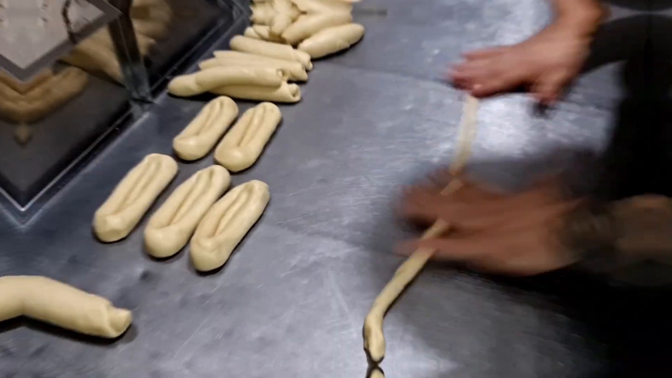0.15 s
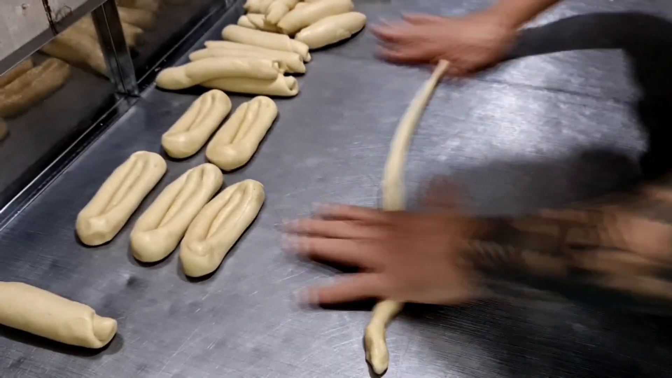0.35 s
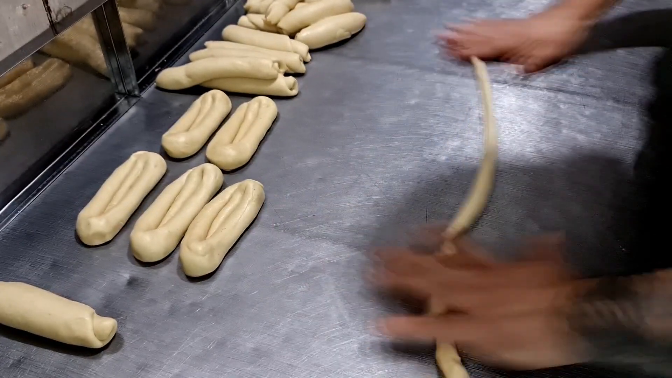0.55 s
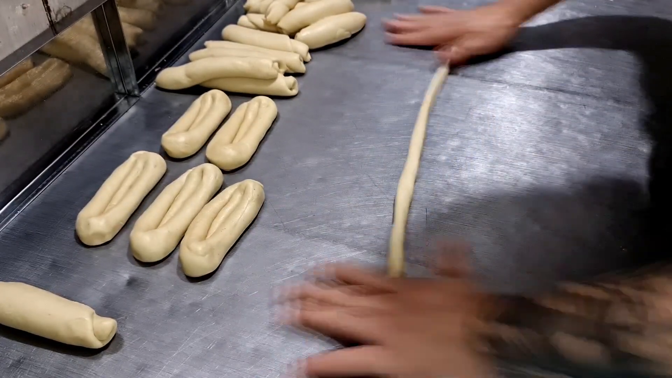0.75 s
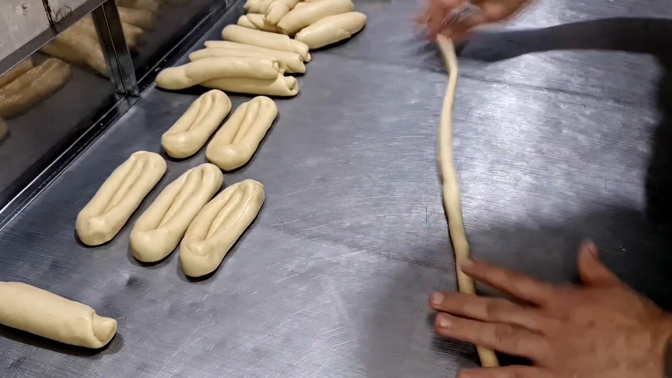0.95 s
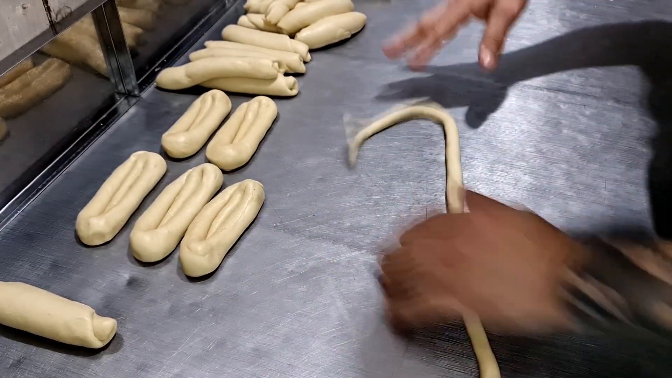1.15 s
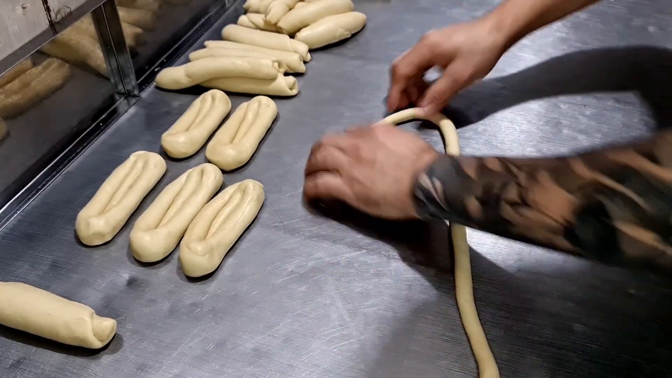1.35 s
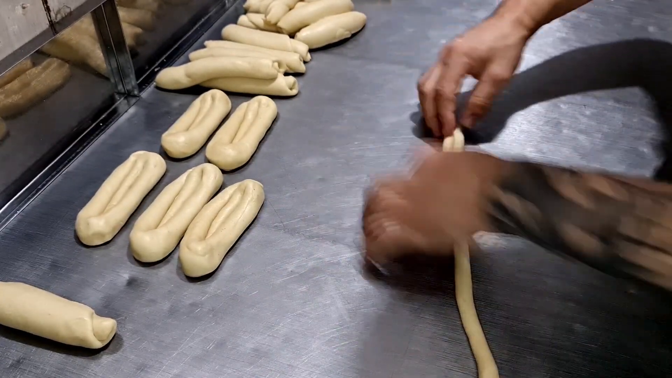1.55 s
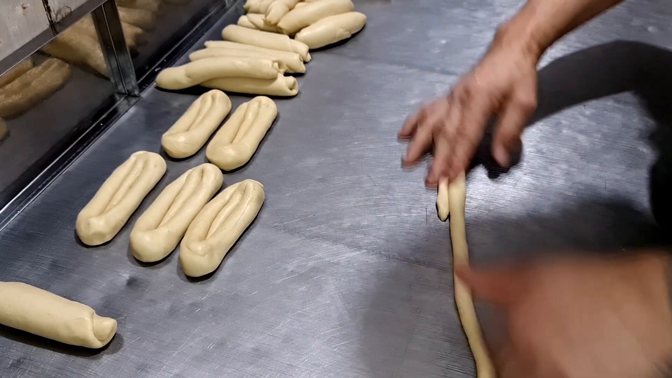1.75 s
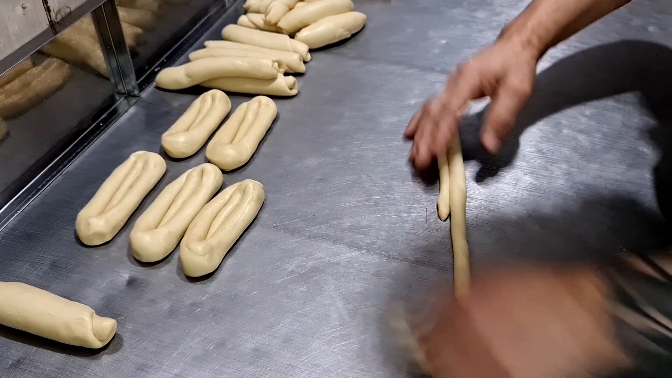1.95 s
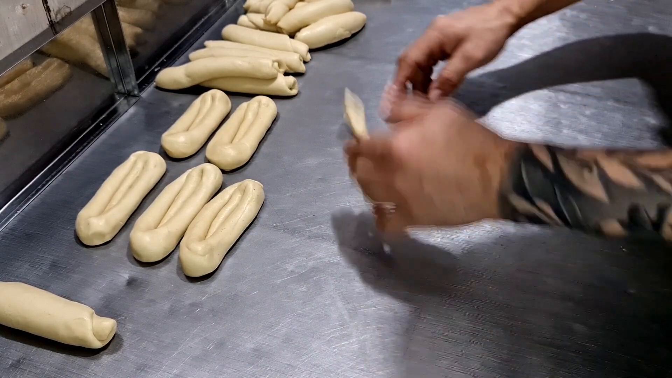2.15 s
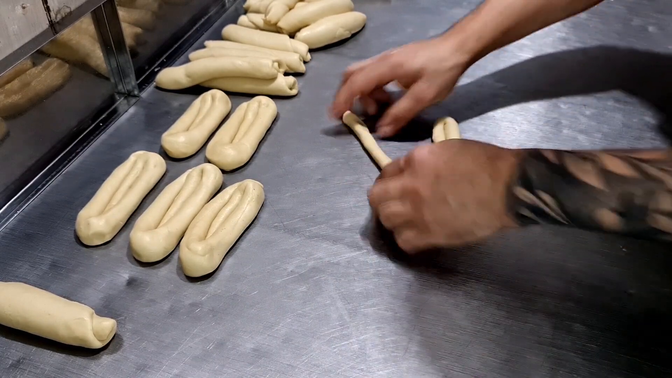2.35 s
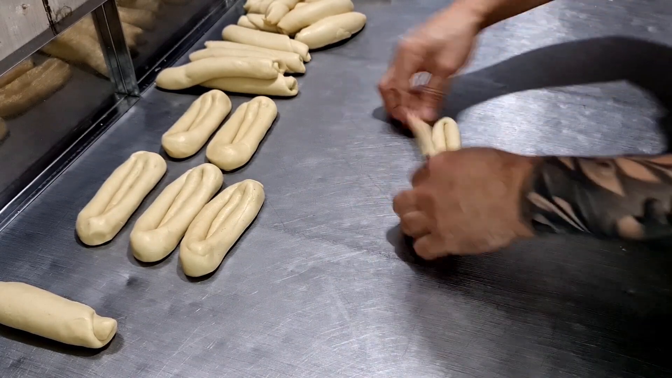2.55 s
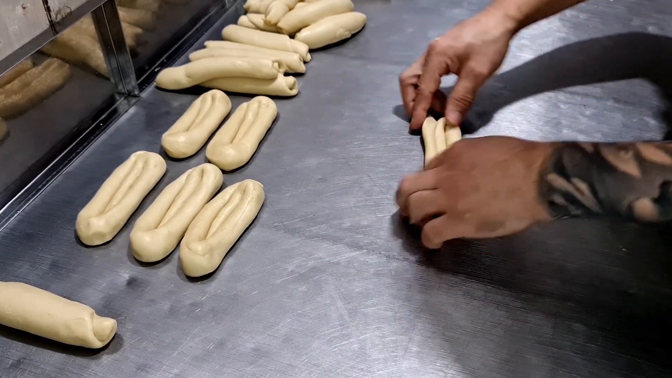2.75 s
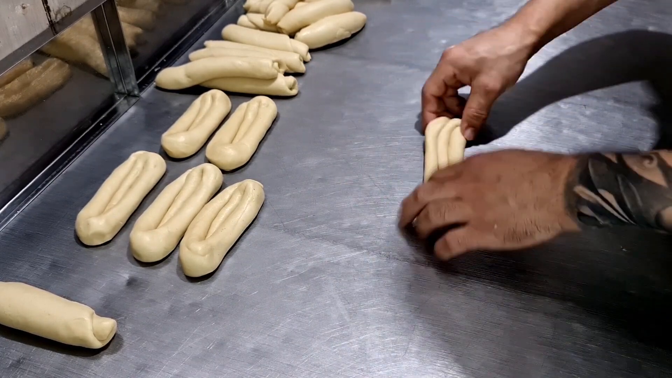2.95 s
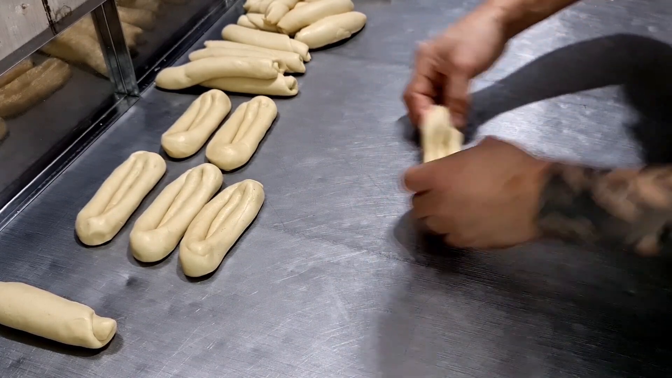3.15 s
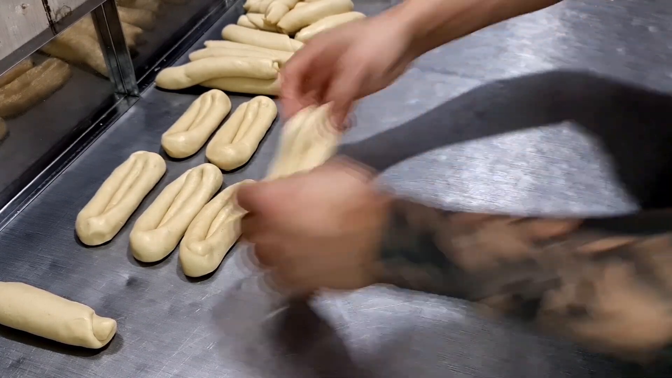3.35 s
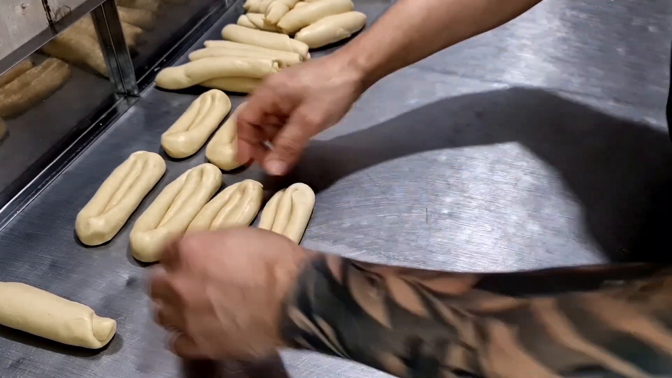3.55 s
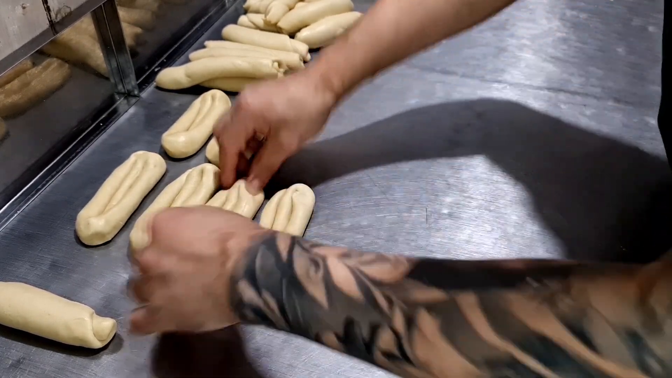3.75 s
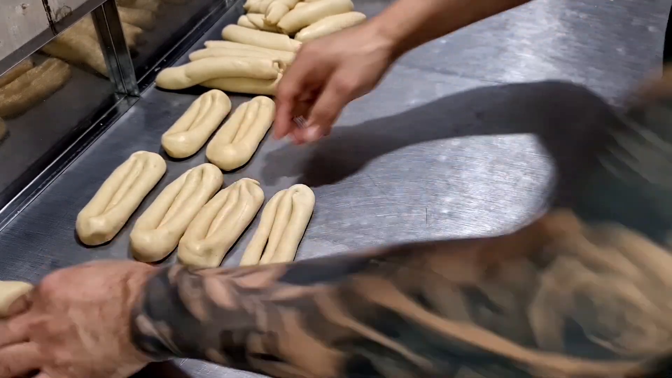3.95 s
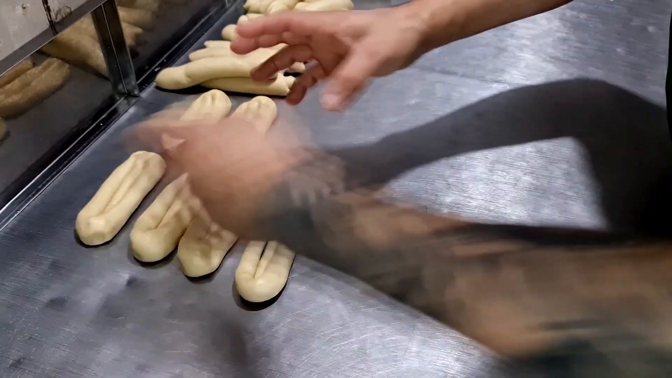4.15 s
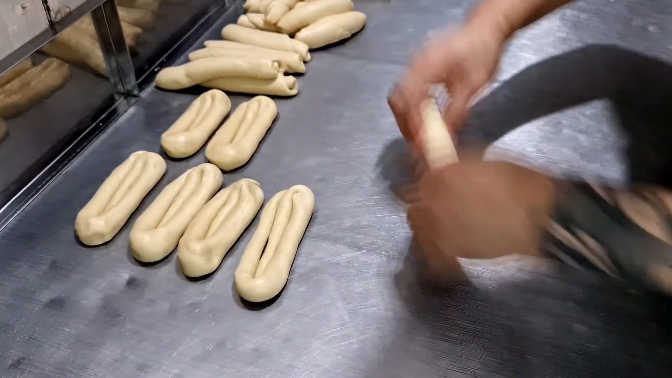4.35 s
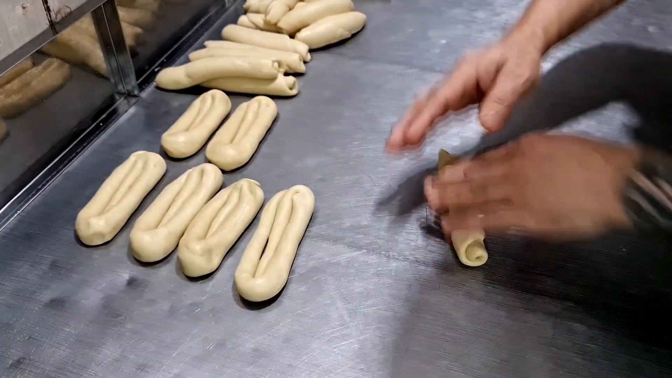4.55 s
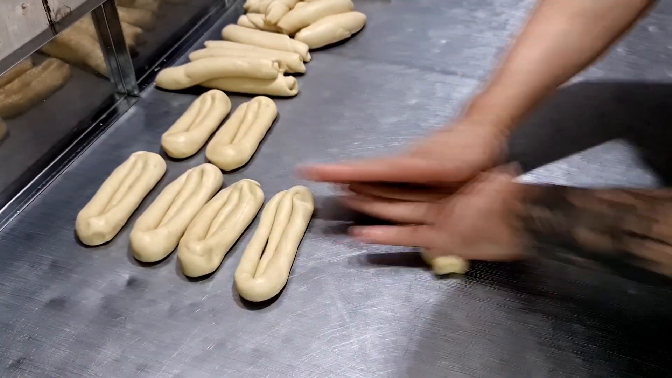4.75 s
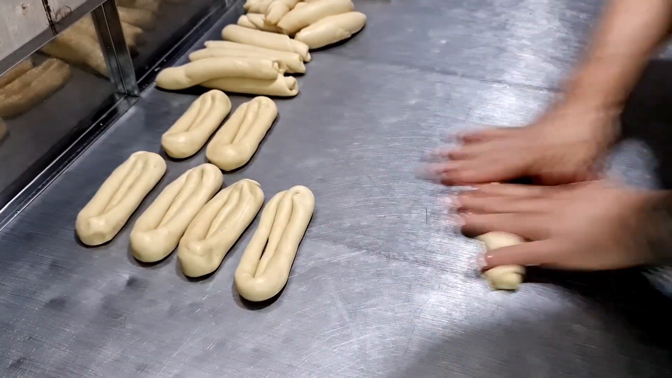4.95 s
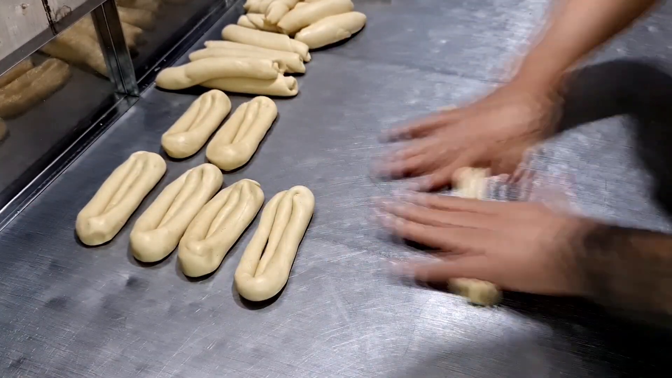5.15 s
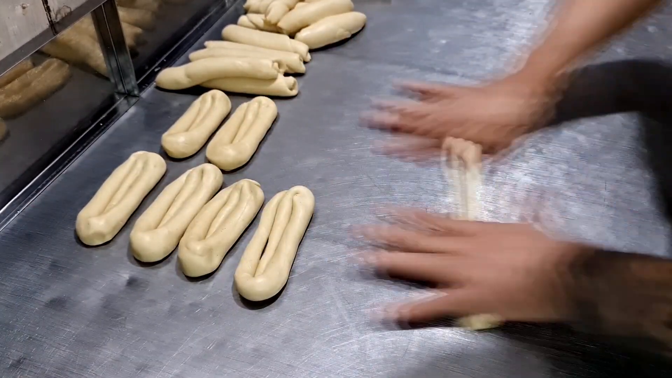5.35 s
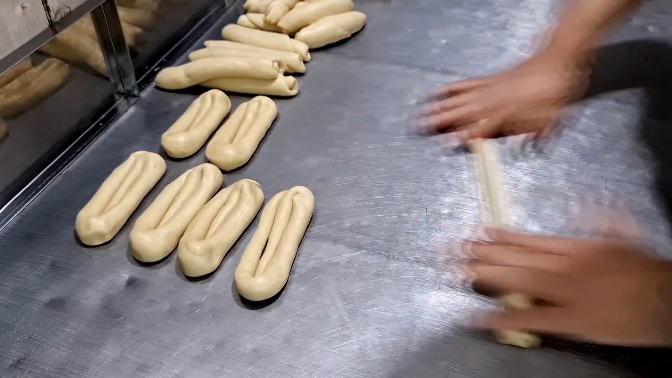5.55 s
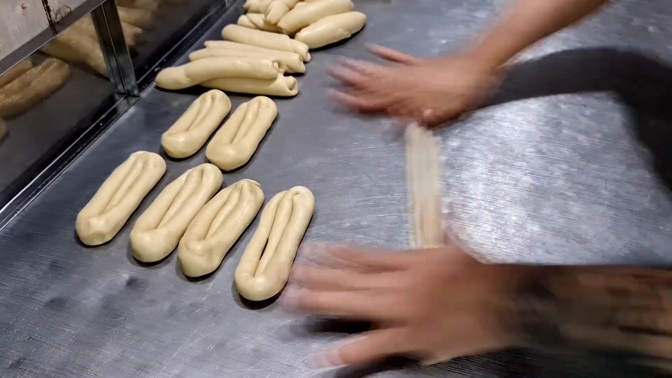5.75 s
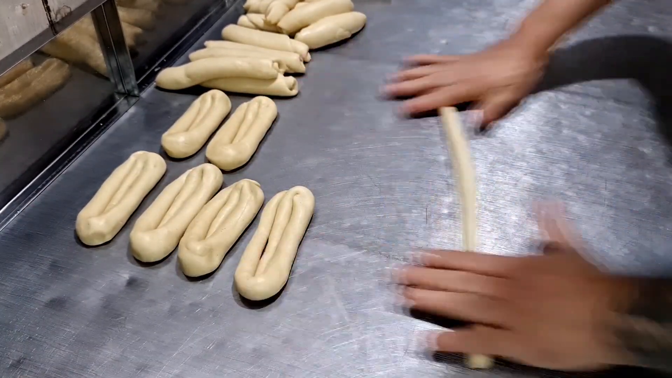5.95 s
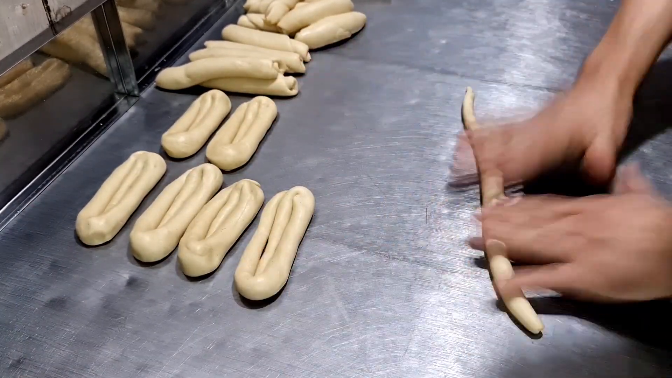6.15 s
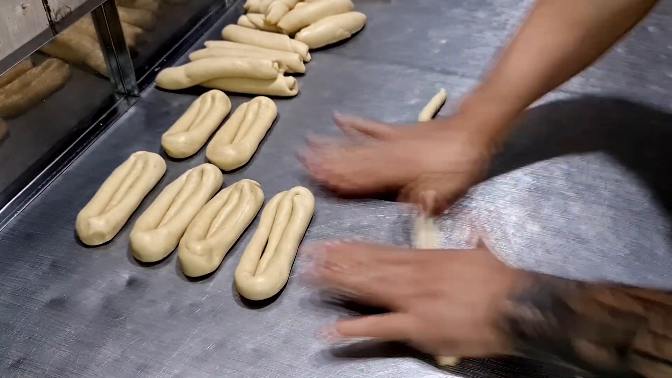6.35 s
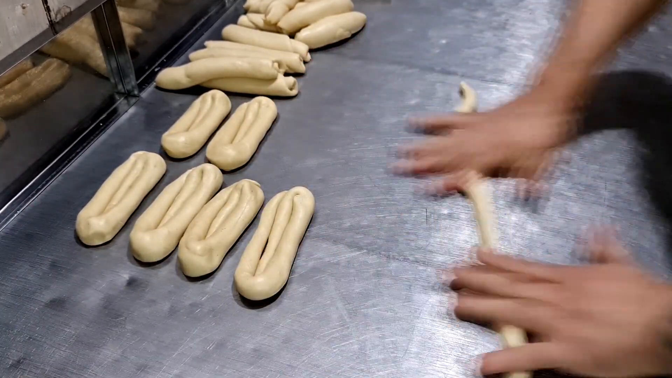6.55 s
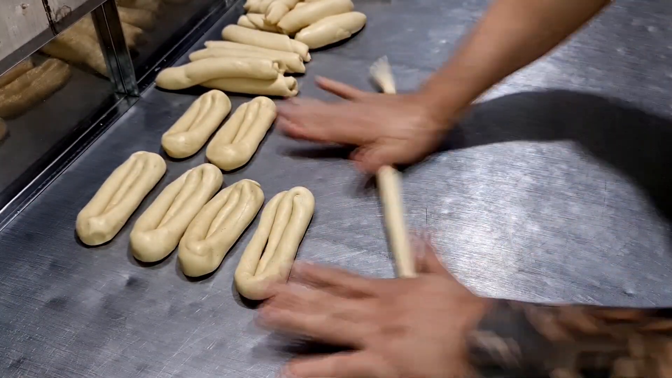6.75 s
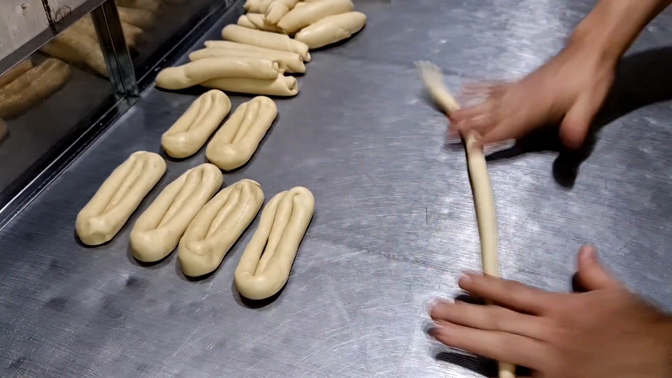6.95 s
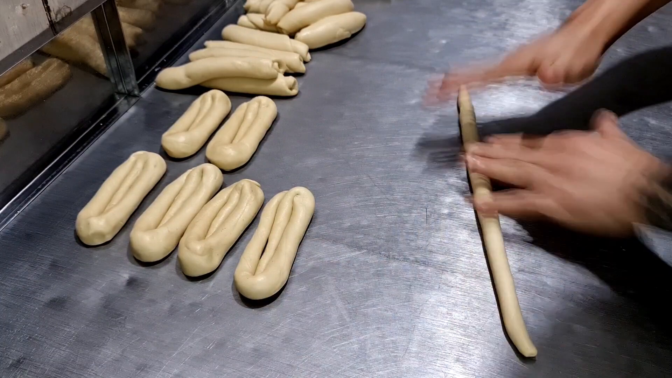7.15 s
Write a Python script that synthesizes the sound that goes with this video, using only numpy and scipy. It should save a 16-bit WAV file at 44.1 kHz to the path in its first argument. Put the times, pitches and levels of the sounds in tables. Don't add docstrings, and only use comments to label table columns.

```python
import sys
import numpy as np
from scipy import signal
from scipy.fft import rfft, irfft, next_fast_len
from scipy.io import wavfile
from scipy.ndimage import map_coordinates

SR = 44100
rng = np.random.default_rng(int(sys.argv[2]) if len(sys.argv) > 2 else 0)


def generate_wav(signal):
    frames = np.transpose(np.atleast_2d(signal))
    scaled = np.clip(frames, -1, 1) * 32767
    pcm = np.round(scaled).astype(np.int16)
    wavfile.write(sys.argv[1], SR, pcm)


def boost_factor(decibels):
    exponent = np.asarray(decibels, float) / 20
    return 10 ** exponent


N = 321354
SCENE_CHANGE = 0.0235

# (frequency [Hz], level [dB], time to fade by 60 dB [s])
SHEET_MODES = [(34.7, -4.5, 0.46), (48.2, -1.5, 0.14), (64.76, 5, 0.34), (96.45, -1.5, 0.38),
               (138.7, 1, 0.26), (156.4, -1, 0.24), (178.5, 0.5, 0.13), (205.3, -6.5, 0.2),
               (248.4, -3, 0.27), (297, -7, 0.24), (334, -2, 0.13), (369.5, -2.5, 0.19),
               (397.8, -6.5, 0.19), (479.7, -5.5, 0.17), (521, -6, 0.12), (635, -8, 0.13),
               (723, -10, 0.067), (847, -11.5, 0.094), (925, -46, 0.08)]


def unit(x):
    return x / np.sqrt(np.mean(np.abs(x) ** 2) + 1e-20)


def along(points, hz):
    f, v = np.transpose(points)
    return np.interp(np.log(hz + 1), np.log(f + 1), v)


def shape(spectrum):
    return lambda hz: boost_factor(along(spectrum, hz))


def wobble(rate):
    return map_coordinates(rng.standard_normal(int(N * rate / SR) + 4), [np.arange(N) * rate / SR])


def filtered(x, response):
    m = next_fast_len(x.shape[-1] + 8192)
    spectrum = rfft(x, m) * response(np.fft.rfftfreq(m, 1 / SR))
    return irfft(spectrum, m)[..., :x.shape[-1]]


def rush(gain, size=N, ripple_db=3.0, ripple_hz=45):
    knots = rng.standard_normal(2000)

    def colour(hz):
        bumps = np.clip(hz / 900, 0, 1) * map_coordinates(knots, [hz / ripple_hz])
        return gain(hz) * boost_factor(ripple_db * bumps)

    return unit(filtered(rng.standard_normal((2, size)), colour))


def gestures(start, hold, peak_db, rise, fall, rest_db):
    t = np.arange(0, N / SR + 1, 1 / 500)[:, None]
    early = np.clip(start - t, 0, None)
    late = np.clip(t - start - hold, 0, None)
    heard = (start > SCENE_CHANGE) | (t < SCENE_CHANGE)
    gains = []
    for peak, up, down, rest in zip(peak_db, rise, fall, rest_db):
        each = heard * boost_factor(2 * (peak - up * early - down * late))
        power = each.sum(axis=1) + boost_factor(2 * rest)
        gains.append(np.interp(np.arange(N) / SR, t[:, 0], np.sqrt(power)))
    return gains


def kitchen():
    # (frequency [Hz], level [dB per Hz])
    air_colour = [(13, -38), (22, 3.5), (50, -7.5), (72, -4), (155, -28), (204, -12), (254, -20.5),
                  (334, -11.5), (500, -17), (873, -16), (1120, -24), (1260, -17.5), (1520, -26),
                  (1690, -22.5), (2000, -31.5), (3000, -28), (3800, -37.5), (6490, -38.5), (9530, -53),
                  (14400, -49), (15600, -60)]
    # (frequency [Hz], level [dB rms])
    hum_tones = [(70, -63.5), (119, -62.5), (202, -60.5), (403, -80), (604, -75)]
    # (time [s], level [dB])
    hum_level = [
        (0, 0),
        (5, 0),
        (5.3, -3),
        (6.1, -9),
        (7.29, -7),
    ]
    t = np.arange(N) / SR
    hum = 0
    for hz, db in hum_tones:
        loudness = boost_factor(db + 3.5 + 1.2 * wobble(3.633))
        hum = hum + loudness * np.sin(2 * np.pi * hz * t + 0.4 * wobble(3.3))
    s, level_db = np.transpose(hum_level)
    air = boost_factor(-56 + 0.75 * wobble(2.94)) * rush(shape(air_colour), ripple_db=0.5)
    return boost_factor(np.interp(t, s, level_db)) * hum + air


def pockets():
    # (time [s], hold [s], pitch [Hz], glide [octaves per s], level [dB])
    closings = [(1.268, .012, 1500, 0, -50), (2.278, .012, 3000, 0, -57), (2.274, .035, 1850, -4, -51),
                (2.488, .03, 5300, -2, -57), (2.488, .015, 6900, 0, -61), (2.666, .006, 2600, 0, -58),
                (3.072, .015, 8700, 0, -64), (3.085, .055, 2400, -9, -52), (3.075, .035, 4500, 0, -55),
                (3.09, .05, 2900, 0, -55), (3.045, .01, 7000, 0, -62), (3.14, .045, 5300, -1, -62),
                (4.508, .03, 1300, 0, -40), (4.535, .045, 2700, 0, -51), (4.545, .035, 1350, 0, -45),
                (5.585, .03, 2300, -8, -56), (5.648, .004, 3300, 0, -56), (5.775, .022, 2000, -2, -55),
                (5.775, .06, 5600, -1, -62), (5.805, .04, 3000, -1, -60), (5.887, .025, 2300, 0, -59),
                (6.03, .04, 2400, 0, -62), (6.12, .05, 3050, 0, -64), (6.714, .03, 510, 0, -47),
                (3.575, .02, 3200, 0, -54), (2.28, .03, 600, 0, -46), (7.103, .03, 750, -6, -51),
                (7.103, .008, 330, 0, -45)]
    width, rise, fall = 0.15, 2700, 510
    size, lead = SR // 4, SR // 25
    out, t = np.zeros((2, N + size)), (np.arange(size) - lead) / SR
    for s, hold, hz, glide, db in closings:
        slow = filtered(rng.standard_normal((2, 2, size)), lambda f: 1 / (1 + (f / (width * hz)) ** 2))
        grain = unit(slow[0] + 1j * slow[1])
        pitch = hz * 2 ** (glide * np.clip(t, 0, hold + 0.034))
        turns = np.cumsum(pitch) / SR
        swell = boost_factor(db - rise * np.clip(-t, 0, None) - fall * np.clip(t - hold, 0, None))
        song = swell * np.real(grain * np.exp(2j * np.pi * turns))
        out[:, round(s * SR) - lead:][:, :size] += song
    return out[:, :N]


def peel():
    # (frequency [Hz], level [dB per Hz])
    bright_colour = [(600, -20), (1100, 0), (1700, -2), (2600, -12), (5000, -18), (8000, -37),
                     (10000, -120)]
    # (frequency [Hz], level [dB per Hz])
    dull_colour = [(300, -20), (600, 0), (1000, -8), (2000, -19), (4000, -37.5), (9000, -120)]
    start, hold, db = 3.088, 0.045, -50
    lag, dull_db, fall = 0.048, -2, 260
    crackle = boost_factor(2.2 * wobble(110) + 2.4 * wobble(600))
    bright, = gestures(np.array([start]), hold, [db], [280], [fall], [-120])
    dull, = gestures(np.array([start + lag]), hold / 2, [db + dull_db], [300], [fall], [-120])
    bright_sound = bright * unit(crackle * rush(shape(bright_colour)))
    return bright_sound + dull * unit(crackle * rush(shape(dull_colour)))


def cracks():
    # (time [s], peak level [dB], centre [Hz], time to fade by 60 dB [s])
    contacts = [(1.2506, -48, 3300, 0.016), (1.2506, -40, 800, .025), (1.2690, -51, 1600, 0.025),
                (1.2745, -41, 1400, .03), (1.3987, -59, 1500, 0.027), (2.2667, -49, 2800, 0.019),
                (2.2677, -47, 1200, .03), (2.2732, -37, 1700, 0.029), (2.2840, -50, 3100, 0.033),
                (2.4877, -52, 5600, .02), (2.6549, -51, 1500, 0.018), (2.6653, -49, 1200, .03),
                (3.5414, -35, 4750, 0.018), (3.5470, -33.5, 3500, .03), (3.5515, -41, 3970, 0.033),
                (3.5460, -39, 1510, 0.027), (4.0322, -61, 1500, 0.018), (4.0477, -55, 1810, .03),
                (4.4950, -34, 750, .05), (4.5047, -23.5, 1390, 0.025), (4.5110, -33, 1500, .03),
                (4.5170, -24, 656, 0.026), (4.5300, -35, 1500, .03), (4.5600, -36, 800, 0.031),
                (5.2145, -53, 1200, 0.022), (5.6000, -51, 2000, .03), (5.6480, -50, 3200, .02),
                (5.7668, -52, 1830, .02), (5.8860, -44, 750, 0.026), (6.3026, -48, 2500, .02),
                (2.4330, -49, 550, .08), (2.4680, -57, 1900, .06), (2.4720, -46, 550, .05),
                (2.6670, -55, 2500, 0.035), (5.6030, -43, 600, .04), (5.6370, -49, 600, .04),
                (5.971, -39.5, 348, 0.072), (5.7950, -47, 250, .06), (0.594, -43, 445, 0.055),
                (0.3300, -47, 520, .05), (3.0729, -46, 2200, .03), (2.4900, -54, 4000, .06),
                (4.5360, -33, 480, .05), (4.5700, -36, 420, .05), (6.7140, -47, 350, .08)]
    width, rise = 0.55, 0.00043
    size = SR // 10
    out, t = np.zeros((2, N + size)), np.arange(size) / SR
    noises = rng.standard_normal((len(contacts), 2, size))
    for (s, db, hz, t60), noise in zip(contacts, noises):
        tone = unit(filtered(noise, lambda f: (f * hz / (hz * hz - f * f + 1j * f * width * hz)) ** 2))
        out[:, round(s * SR):][:, :size] += boost_factor(db - 60 * t / t60) * (1 - np.exp(-t / rise)) * tone
    return out[:, :N]


def slaps():
    # (time [s], peak [dB], brightness [dB per octave], tail length [0-1], sizzle above 8 kHz [dB])
    hits = [(1.251, -43.5, 5, 0.92, -8), (1.27, -30.5, -3.5, 0.88, -10), (1.399, -49.5, -2, 1, -6),
            (2.266, -36.5, 0.5, 0.65, 1), (2.272, -31, -5, 0.45, 1), (2.654, -43.5, -6, 0.6, -10),
            (2.665, -44, -2.5, 0.5, -10), (3.542, -28, 2.5, 0.95, -16), (4.49, -37.5, 0, 1, -5),
            (4.504, -18, -2, 0.98, -3.5), (4.512, -20.5, -3.5, 0.83, -12), (4.737, -44.5, -3.5, 0.44, 4),
            (5.885, -50, -2.5, 0.6, 11), (6.303, -46, 4, 1, -17), (7.103, -41.5, -7, 1, 2)]
    # (frequency [Hz], level [dB per Hz])
    slap_colour = [(290, -23), (500, -14.5), (758, -20), (803, -21), (960, -21), (1300, -17), (1670, -21),
                   (2040, -29.5), (2720, -25.5), (3850, -37), (15500, -52)]
    # (frequency [Hz], time to fade by 60 dB [s])
    slap_fade = [(600, 0.25), (2000, 0.2), (6000, 0.28), (12000, 0.22)]
    size = SR // 3
    out, t = np.zeros((2, N + size)), np.arange(size) / SR
    front = (1 + 0.91 * boost_factor(-60 * t / 0.015)) * (1 - np.exp(-t / 0.00056))
    for s, db, bright_db, tail, sizzle_db in hits:

        def colour(hz):
            tilt_db = bright_db * np.log2(np.clip(hz, 300, 6000) / 2000)
            return boost_factor(along(slap_colour, hz) + tilt_db + sizzle_db * np.clip(hz / 1500 - 4.5, 0, 1))

        burst = rush(colour, size=size, ripple_db=1.5)
        hz, u, z = signal.stft(burst, SR, nperseg=128)
        fading = boost_factor(-60 * u / (tail * along(slap_fade, hz)[:, None]))
        faded = signal.istft(z * fading, SR, nperseg=128)[1][:, :size]
        out[:, round(s * SR):][:, :size] += boost_factor(db - 4.0) * front * faded
    return out[:, :N]


def sheet(hz, wide=1.63):
    total = 0
    for k, (centre, db, t60) in enumerate(SHEET_MODES):
        width = wide * np.log(1000) / (np.pi * t60)
        damping = 1j * hz * width
        total = total + (-1) ** k * boost_factor(db) * damping / (centre * centre - hz * hz + damping)
    return total


def leaning():
    # (time of full weight [s], hold [s], boom [dB], drumming [dB])
    leans = [(0.0, 0.011, -25, -35), (0.11, 0.11, -44, -48), (0.496, .01, -37, -62), (0.36, 0.07, -45, -48),
             (0.576, 0.031, -42, -46), (0.736, 0.056, -55, -46), (0.834, 0.011, -41, -53),
             (0.939, .04, -42.5, -49.5), (4.656, 0.15, -42.5, -53.5), (4.915, 0.12, -42.5, -59.5),
             (5.09, 0.05, -38, -48), (5.247, 0.011, -53, -44.5), (5.28, 0.036, -37.5, -47.5),
             (5.444, 0.074, -44, -42), (5.641, 0.0084, -29, -40), (5.851, 0.054, -42, -42),
             (6.017, 0.06, -36, -45), (6.14, 0.086, -49, -49), (6.34, 0.047, -41, -47.5),
             (6.532, 0.014, -34.5, -45.5), (6.663, .02, -63, -55), (6.73, 0.019, -42, -49),
             (6.903, 0.05, -49, -50), (7.09, 0.03, -47, -55)]
    # (time [s], hold [s], boom [dB], drumming [dB])
    pinches = [(1.37, 0.14, -43.5, -55), (1.668, 0.0053, -50, -47.5), (1.834, 0.011, -46.5, -72),
               (1.916, 0.12, -46.5, -50), (2.22, 0.015, -62, -51), (2.35, 0.017, -46, -61),
               (2.445, 0.027, -49, -50), (2.51, 0.17, -48, -53.5), (2.685, 0.015, -38.5, -58),
               (2.992, 0.21, -49, -52), (3.274, 0.0074, -44, -54), (3.52, 0.18, -56, -63),
               (3.768, 0.011, -37, -52.5), (4.059, 0.089, -32, -47.5), (4.3, .15, -71, -80),
               (7.22, .07, -68, -71), (3.88, 0.01, -50, -51.5)]
    s, hold, *weight_db = np.transpose(leans + pinches)
    boom_gain, drum_gain = gestures(s, hold, weight_db, [330, 200], [210, 170], [-58.5, -71])
    boom = rush(lambda hz: sheet(hz) / (1 + (hz / 115) ** 6))
    drum = rush(lambda hz: sheet(hz) / (1 + (125 / (hz + 1)) ** 6) / (1 + (hz / 650) ** 4))
    drum = unit(boost_factor(1.5 * wobble(30)) * drum)
    return boost_factor(-1.3) * boom_gain * boom + boost_factor(-5.0) * drum_gain * drum


def rubbing():
    # (time of full speed [s], hold [s], rub [dB], then above the rub: scuff [dB], flour hiss [dB])
    rolls = [(0.014, 0.016, -54.5, -2, -6.5), (0.096, 0.071, -59, -9, -11.5),
             (0.289, 0.098, -64.5, -7, -13.5), (0.493, 0.091, -60, -6, -11), (0.714, 0.062, -61, -6, -9.5),
             (0.859, 0.14, -64, -4.5, -4.5), (4.712, 0.029, -64.5, -1, -11),
             (4.865, 0.078, -65.5, -4.5, -6), (5.064, 0.067, -62.5, -9.5, -11),
             (5.225, 0.06, -60, -6.5, -11), (5.428, 0.07, -60.5, -6.5, -11), (5.588, 0.057, -57.5, -5, -13),
             (5.786, 0.018, -57, -2, -3), (5.856, 0.03, -65, 3, -24), (5.965, 0.092, -60, -5, -8.5),
             (6.301, 0.066, -63, -9, -13.5), (6.461, 0.071, -61.5, -6, -12.5),
             (6.673, 0.097, -62, -2.5, -4.5), (6.871, 0.069, -60.5, -5.5, -11)]
    # (time [s], hold [s], rub [dB], then above it: scuff [dB], hiss [dB])
    brushes = [(1.406, 0.047, -65, -2.5, -8.5), (1.658, 0.0078, -70, -7, -10), (1.84, 0.036, -78.5, 6, 3),
               (1.962, 0.043, -66.5, 3, -7), (2.27, 0.032, -61, -9, -20), (2.42, 0.064, -66, -6, -14.5),
               (2.487, 0.0087, -62.5, -6, -22), (2.658, 0.016, -62.5, -8, -20), (2.856, .02, -75, -4, -13),
               (3.072, 0.059, -56, -1.5, -17), (3.255, 0.014, -66.5, -16, -24),
               (3.52, 0.079, -64.5, -15, -16), (3.801, .05, -75, -11, -9), (4.054, 0.073, -60, -7, -14.5),
               (4.25, 0.15, -70.5, -9, -19), (4.47, 0.14, -70, -1.5, -13), (7.02, 0.024, -67.5, -4, -9.5),
               (4.79, 0.018, -73, -3, -3), (3.04, .01, -75, 7, -2), (3.222, .005, -69, -2, -8),
               (2.97, 0.03, -74, -10, -25)]
    # (frequency [Hz], level [dB per Hz])
    rub_colour = [(290, -37), (500, -13.5), (587, -1), (645, -1), (1330, -5.5), (1650, -8), (3800, -15),
                  (4940, -25), (8360, -120)]
    # (frequency [Hz], level [dB per Hz])
    scuff_colour = [(2500, -9.5), (3600, -15), (5400, -9.5), (7500, -14.5), (8900, -16), (9700, -39)]
    # (frequency [Hz], level [dB per Hz])
    flour_colour = [(4120, -4.5), (7000, -1), (8680, -17), (9160, -10), (14400, -3.5), (14900, -8),
                    (15600, -5)]
    rise, fall = [540, 570, 380], [136, 160, 184]
    rest_db = [-79, -100.5, -101]
    s, hold, rub_db, scuff_db, hiss_db = np.transpose(rolls + brushes)
    peak_db = [rub_db, rub_db + scuff_db, rub_db + hiss_db]
    rub_gain, scuff_gain, hiss_gain = gestures(s, hold, peak_db, rise, fall, rest_db)
    grit = boost_factor(1.0 * wobble(30) + 2.3 * wobble(350))
    rub = unit(grit * rush(shape(rub_colour)))
    scuff = unit(grit * rush(shape(scuff_colour)))
    hiss = unit(grit ** 0.2 * rush(shape(flour_colour)))
    return boost_factor(5.0) * rub_gain * rub + boost_factor(1.0) * scuff_gain * scuff + boost_factor(8.0) * hiss_gain * hiss


def blows():
    # (time [s], knock near 100 Hz [dB], then above the knock: boom [dB], 150 Hz [dB], upper ring [dB])
    slams = [(1.249, -34, -14, 9.5, 7.5), (1.272, -49, 13, 4, 13), (1.401, -32.5, -0.5, -6.5, -23),
             (1.901, -41, -16, -1.5, -4.5), (2.257, -38.5, -21, 5.5, -16), (2.267, -36.5, 2, 11.5, 5),
             (2.499, -47.5, 6, -9, -1), (2.66, -48, 14, 12.5, -5), (3.253, -50, -3, 10, -7),
             (3.541, -25.5, -7, 2.5, -4), (3.744, -40.5, 2.5, -7.5, -24), (4.056, -31, -2, -14, -26),
             (4.102, -44, -18, -12, 0), (4.503, -9, -2, -13, -5.5), (4.513, -41, -4, -31, 21.5)]
    # (time [s], knock
    # near 100 Hz [dB], then above the knock: boom [dB], 150 Hz [dB], upper ring [dB])
    knocks = [(0.352, -39.5, -22, 6, 2), (0.538, -36, -6, -3, 1), (0.604, -31, -11.5, -8.5, -15),
              (5.439, -21, -16, -7, -29.5), (5.603, -33, 1, -7, -17), (5.634, -39, 1, -8, -19),
              (5.814, -35, -2.5, -7.5, -11), (5.853, -34, -18, 0, -4.5), (5.884, -58, -19, -3, 11),
              (6.281, -49, 22.5, -10, -3), (6.644, -50.5, 0, 9, 5), (6.713, -40.5, 4.5, -2.5, 2.5),
              (7.101, -49, -5, 2, 7.5), (0.036, -51, -7, 11, -12), (0.124, -44, -10, 5.5, 2.5),
              (0.19, -49, -16, 9.5, 5.5), (0.372, -40, -7, -7, -10), (6.012, -43.5, -10, 7, -5.5),
              (6.047, -38, -1, -13, -7), (6.878, -54, -14, 8, 7.5), (6.94, -46, -1.5, 0, -6),
              (2.676, -49, -14, 9.5, -11), (4.491, -33.5, -8, 0, 5.5), (4.553, -32.5, -4, 5, 6),
              (3.554, -37.5, -15, 8.5, -6), (2.668, -51.5, 2, 16.5, -8)]
    opposed_db = -3
    middle_share, middle_db = 0.49, -1.5
    size = SR // 2
    out, t = np.zeros((2, N + size)), np.arange(size) / SR
    hz, level_db, t60 = np.transpose(SHEET_MODES)
    rise = 1 - np.exp(-t / (0.0072 + 0.43 / hz[:, None]))
    ahead = np.array([0, np.pi / 2])[:, None, None]
    modes = rise * boost_factor(-60 * t / t60[:, None]) * np.sin(2 * np.pi * hz[:, None] * t + ahead)
    k = np.arange(len(hz))
    sides = -(-1.) ** np.where(k < 4, k, k // 2)
    luck = rng.standard_normal((len(slams + knocks), 2, len(hz)))
    for (s, db, boom_db, low_db, upper_db), spread in zip(slams + knocks, luck):
        mid_db = low_db + middle_share * (upper_db - low_db) + middle_db
        top_db = upper_db + 0.26 * (db + upper_db + 18.0)
        balance = [(70, boom_db), (97, 0), (140, low_db), (205, low_db), (250, mid_db), (340, mid_db),
                   (370, upper_db), (400, upper_db), (480, top_db)]
        place_db = along(balance, hz)
        strength_db = db + 0.5 + level_db + place_db + [[0], [opposed_db]] + 1.67 * spread
        ring = ((sides * boost_factor(strength_db))[:, None] @ modes)[:, 0]
        out[:, round(s * SR):][:, :size] += ring
    return out[:, :N]


def ports(pair):
    # (frequency [Hz], likeness [-1 to 1])
    alike = [(60, 1), (150, 0.98), (200, 0.96), (270, 0.095), (380, 0.59), (500, -0.2), (650, -0.1),
             (1150, -0.66), (1500, -0.15), (2000, -0.2), (5000, -0.022), (12000, -0.042)]
    # (frequency [Hz], left above right [dB])
    side_tilt = [(200, -0.2), (270, -3.5), (370, -4), (480, -2.5), (650, -0.44), (5000, -1.5), (10000, 0.5)]

    def split(hz):
        turn = np.arccos(np.clip(along(alike, hz), -1, 1)) / 2
        return np.array([np.cos(turn), np.sin(turn)])

    def port(hz, sign, cut_hz):
        return boost_factor(sign * along(side_tilt, hz) / 2) * 1j * hz / (cut_hz + 1j * hz)

    both, apart = filtered(pair, split)
    sides = np.array([both + apart, both - apart])
    return filtered(sides, lambda hz: np.array([port(hz, 0.9, 26), port(hz, -1.64, 4.1)]))


def scene():
    dough = pockets() + peel() + cracks() + slaps()
    return ports(kitchen() + dough + leaning() + rubbing() + blows())


def low_pass(x):
    return signal.sosfilt(signal.butter(12, 15500, fs=SR, output="sos"), x)


def record(dry):
    after = np.arange(N) / SR - SCENE_CHANGE
    fade = np.where(after < 0, 1, np.clip(after / 0.009, 0, 1))
    mix = filtered(dry * fade, lambda hz: hz < 15500)
    return low_pass(mix)


dry = scene()
out = record(dry)
generate_wav(out)
```